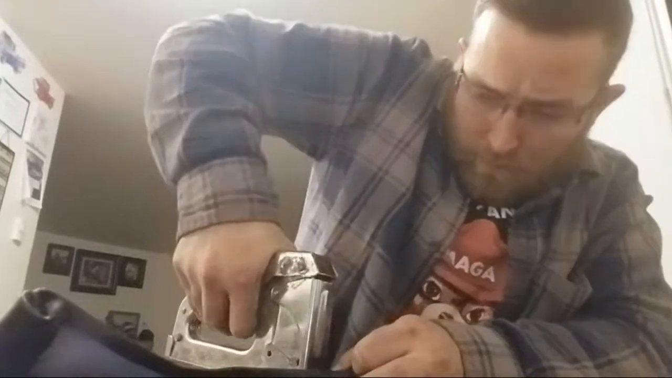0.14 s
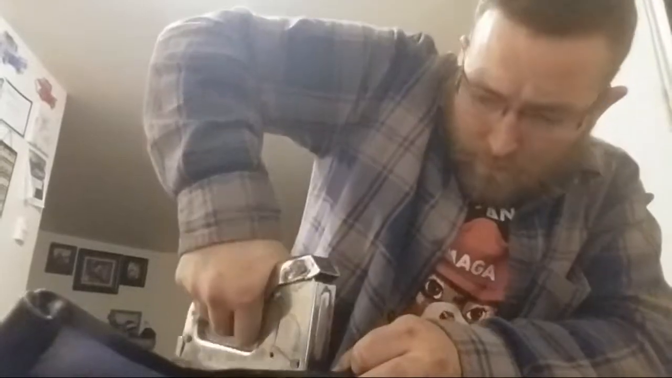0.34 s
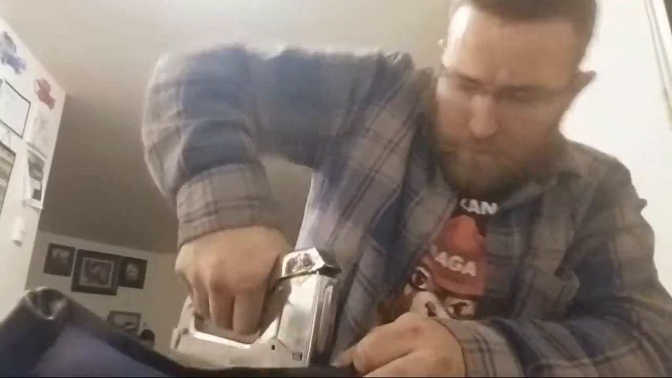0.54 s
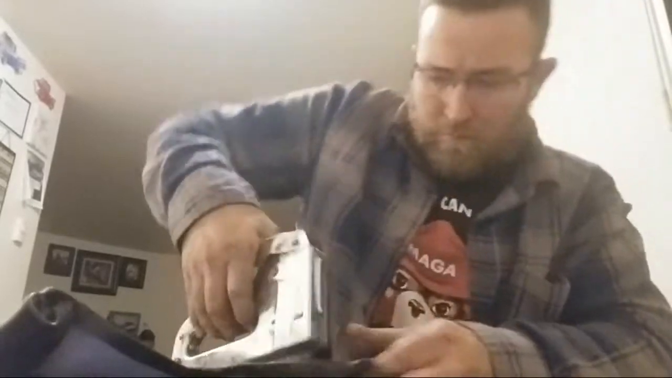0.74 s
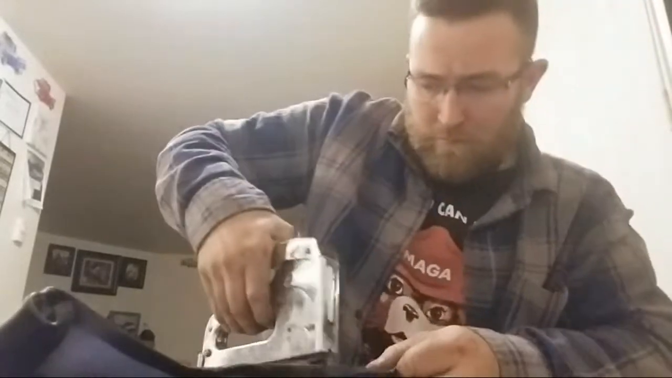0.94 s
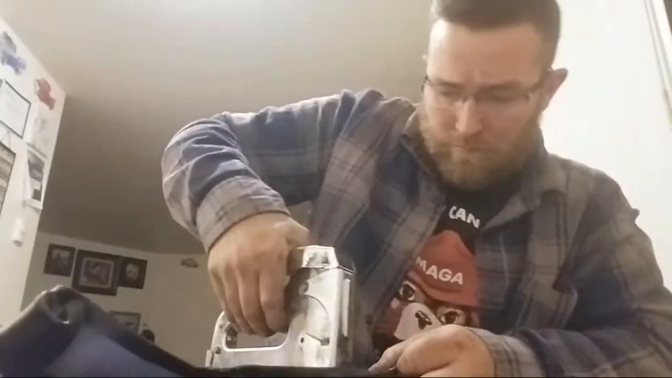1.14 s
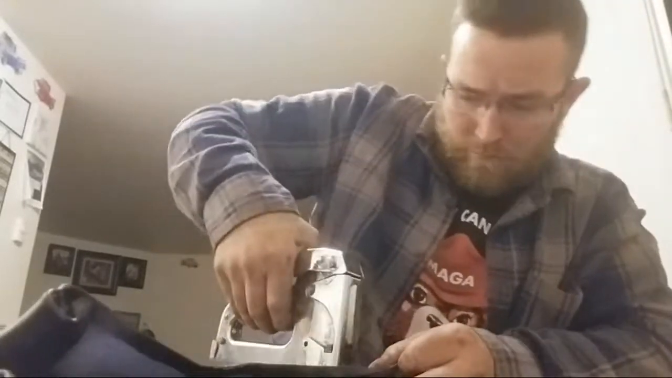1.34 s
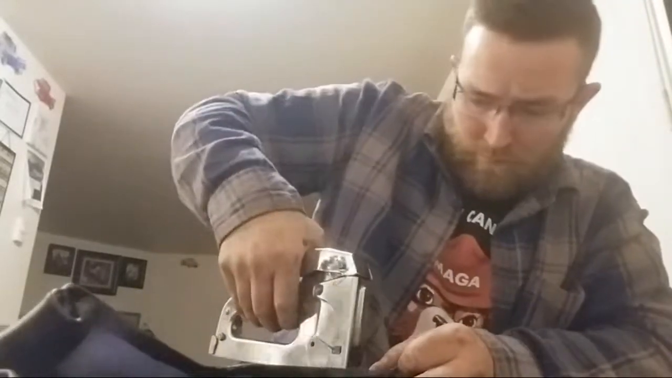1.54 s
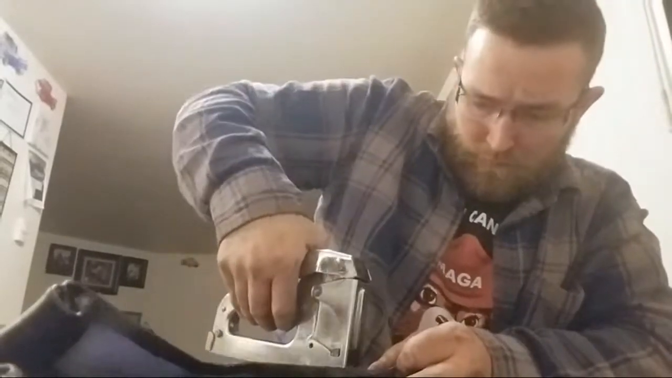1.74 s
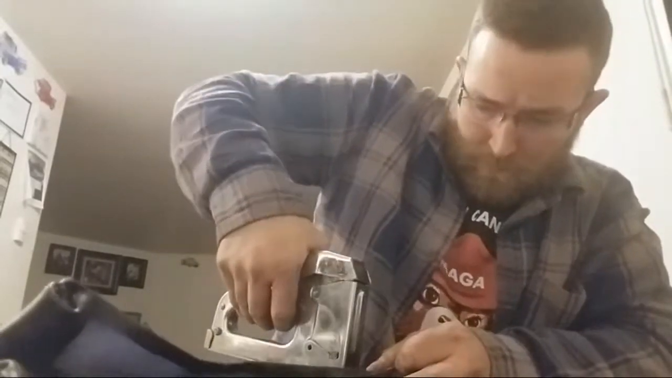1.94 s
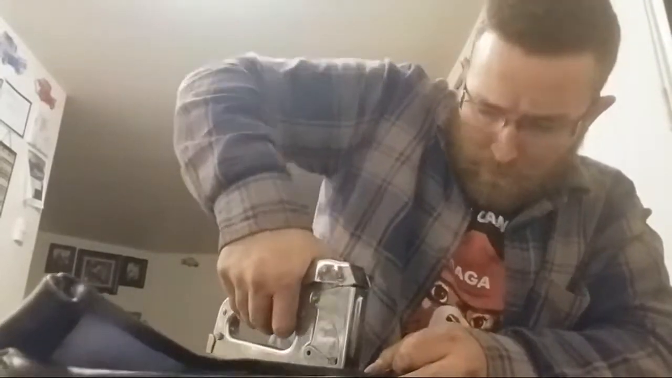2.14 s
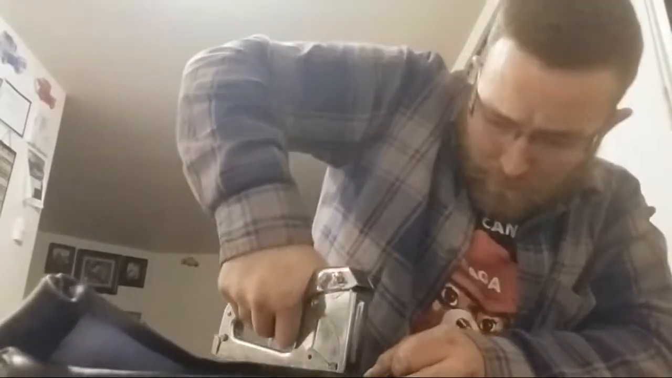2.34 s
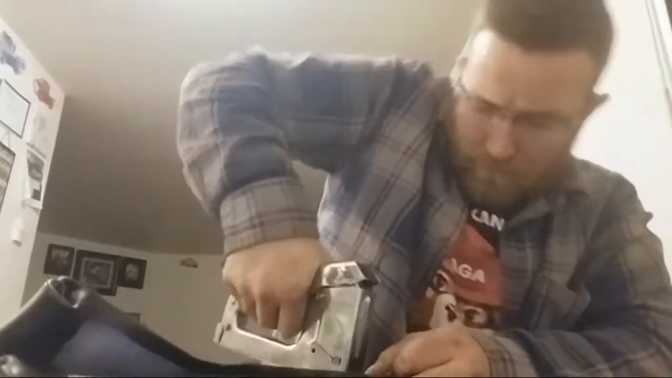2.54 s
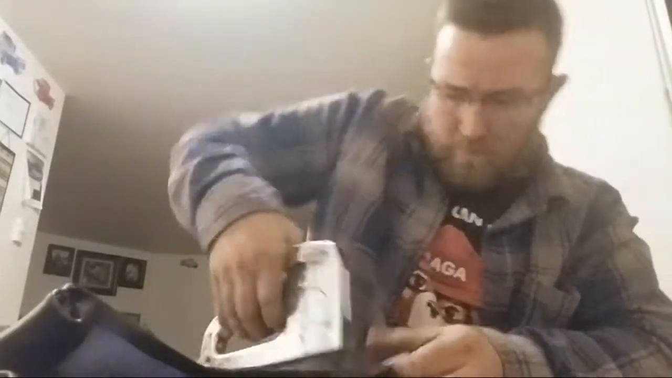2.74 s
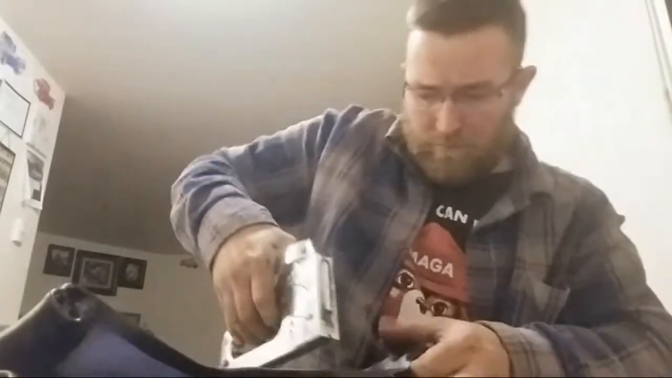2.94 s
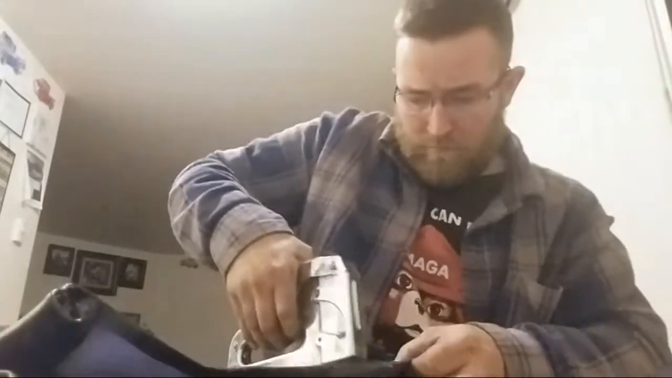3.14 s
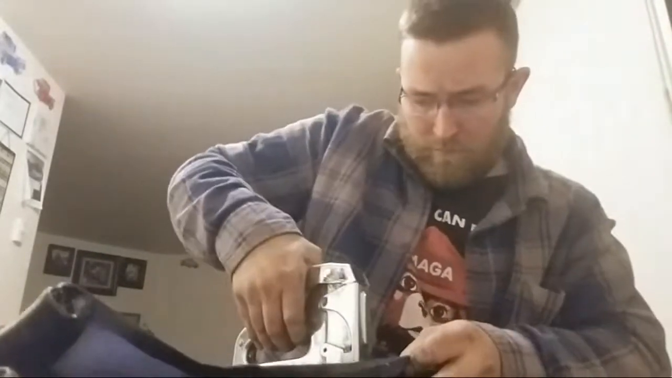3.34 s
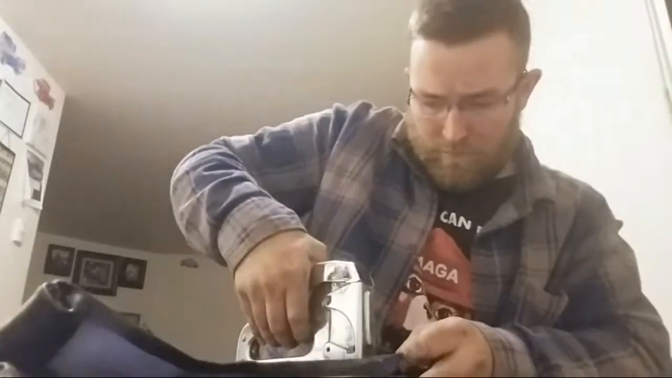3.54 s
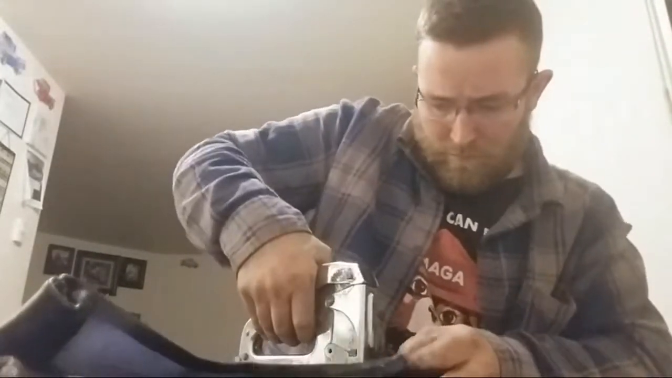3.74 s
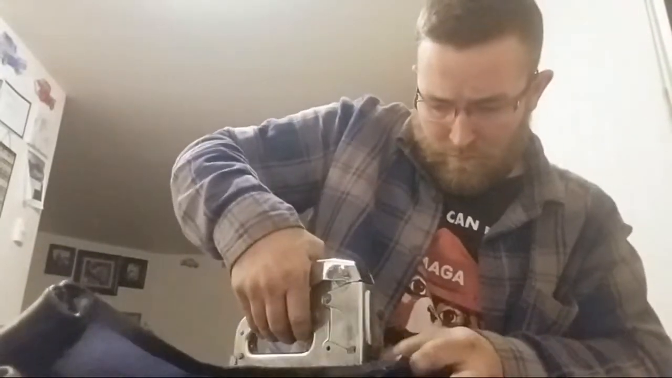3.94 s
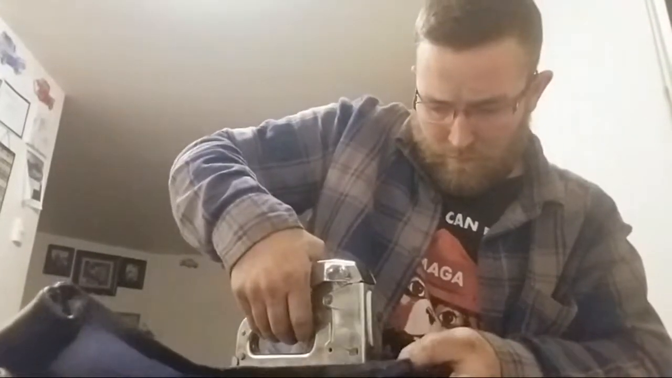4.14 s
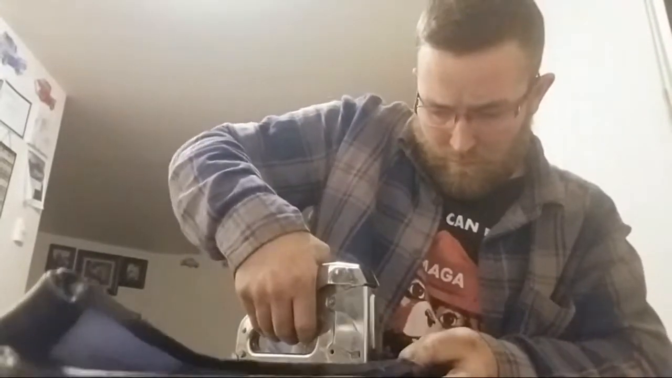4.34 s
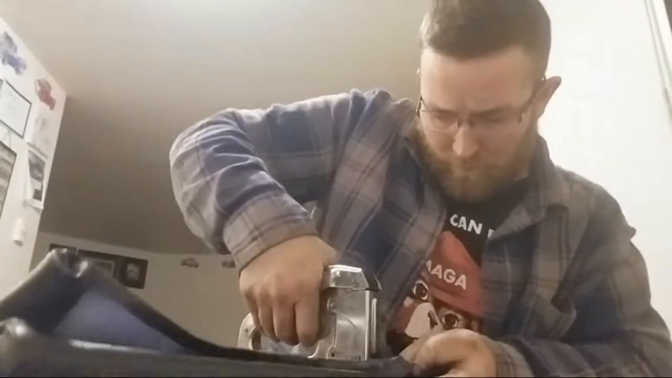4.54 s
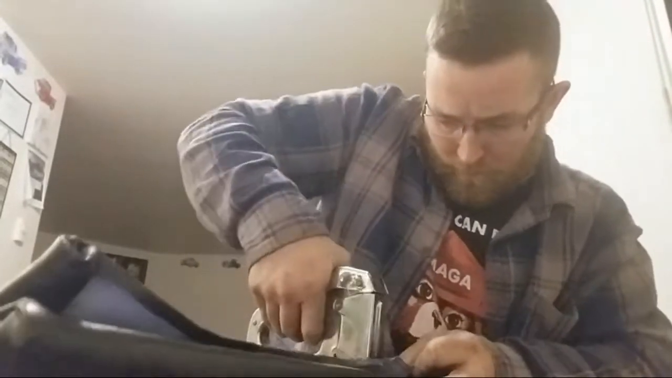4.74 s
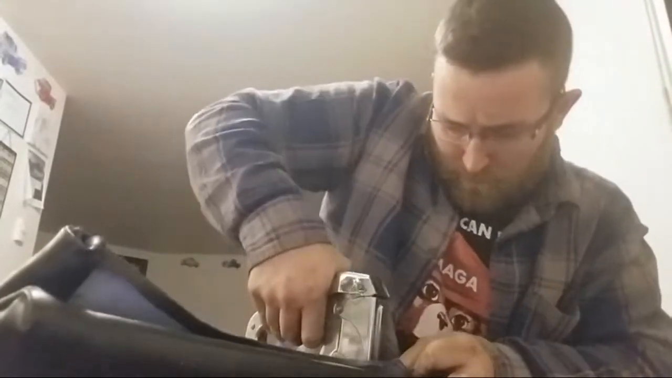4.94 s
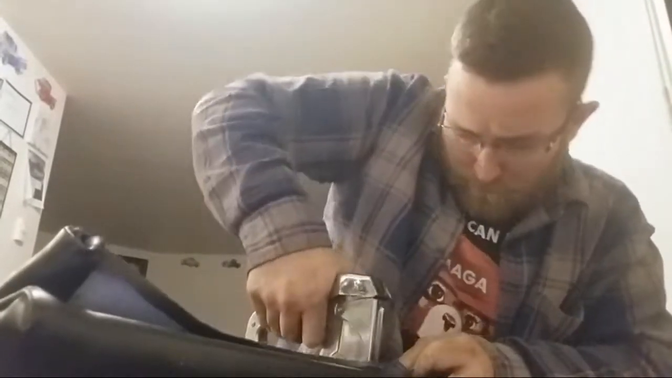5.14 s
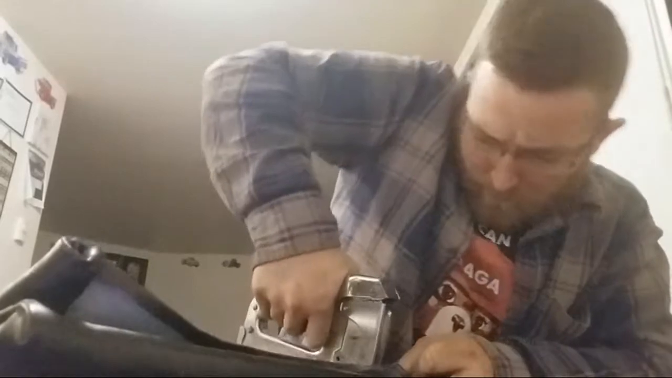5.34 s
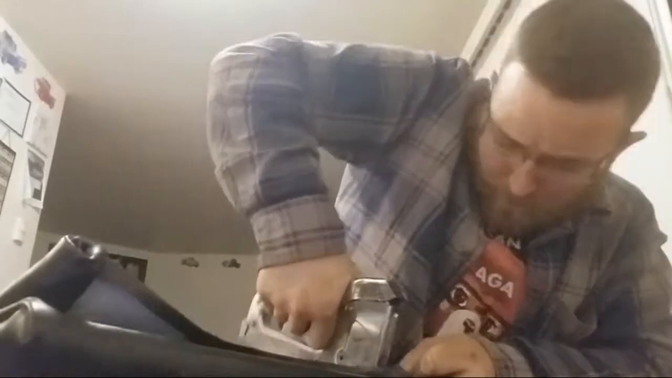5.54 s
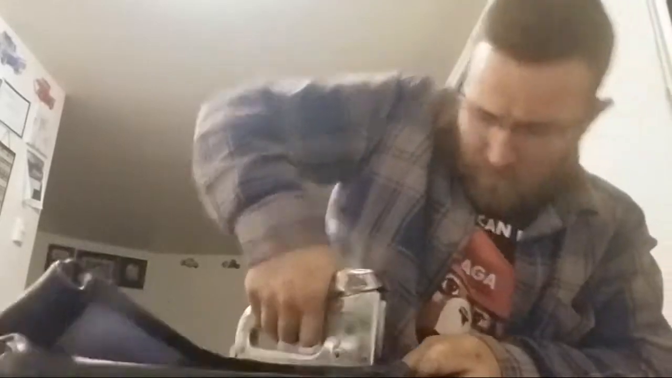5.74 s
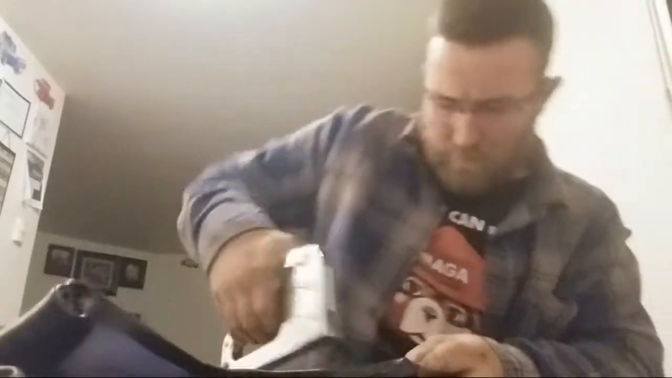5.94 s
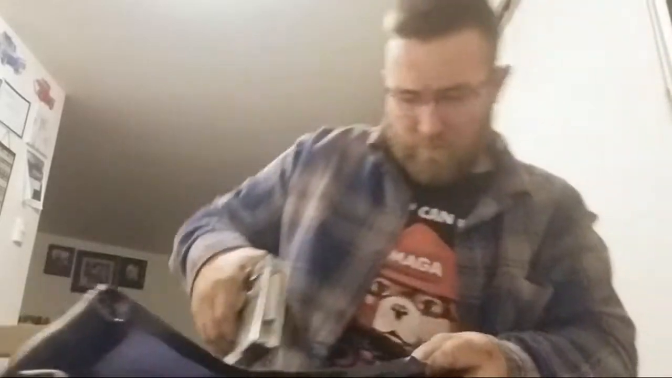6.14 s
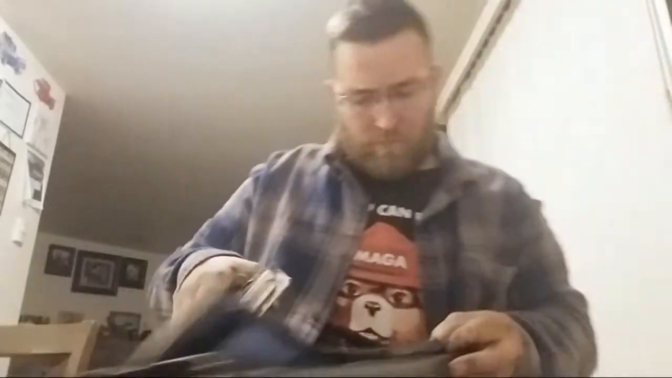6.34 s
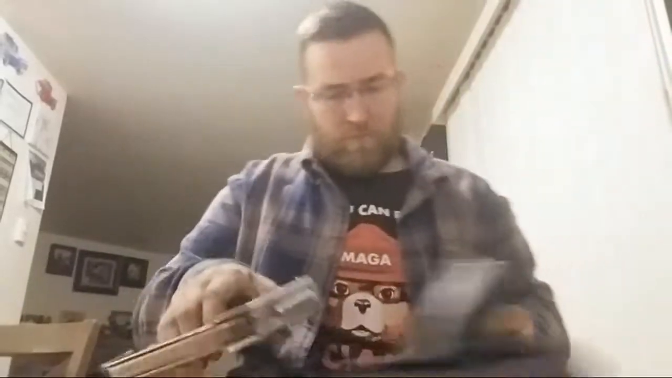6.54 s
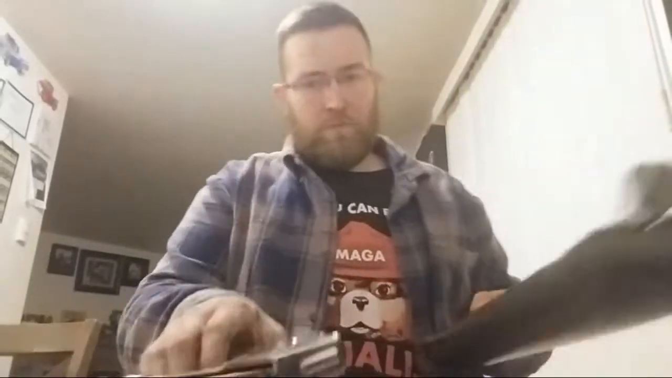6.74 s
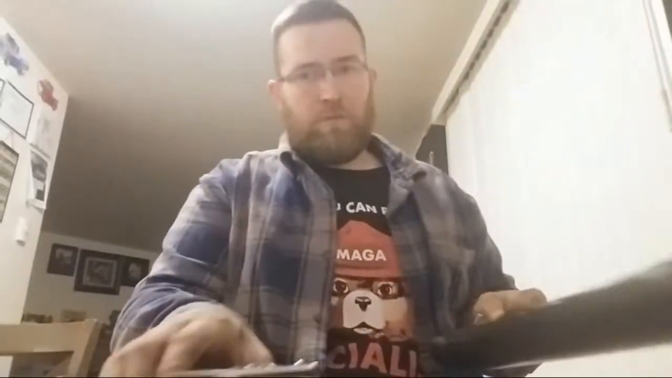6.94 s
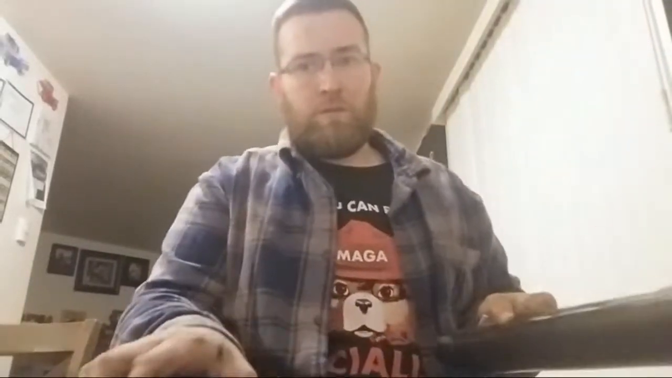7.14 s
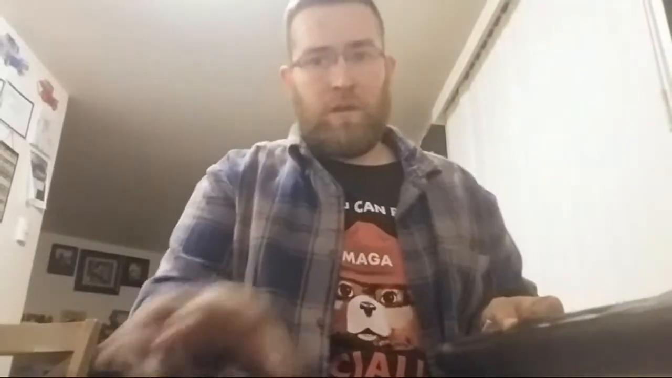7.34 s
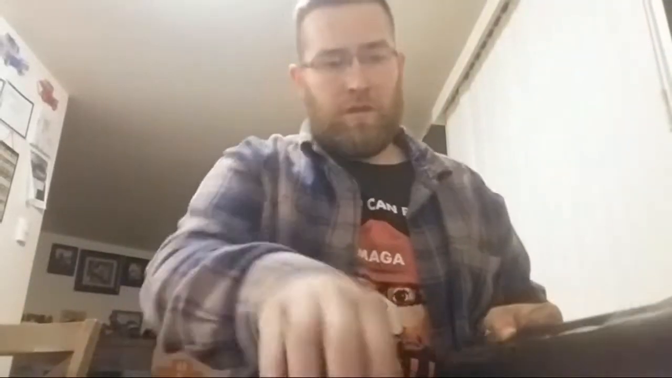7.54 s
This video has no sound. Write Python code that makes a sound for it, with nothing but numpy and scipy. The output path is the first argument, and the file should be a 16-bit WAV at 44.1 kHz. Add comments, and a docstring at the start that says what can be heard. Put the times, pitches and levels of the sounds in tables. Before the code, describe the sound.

In a small indoor room, close to the microphone, a sleeve rubs faintly, then a hand staple gun fires with a tiny latch snap and a hard woody slam. The handle clicks back, its spring singing thinly. Two more shots follow after pauses of cloth rustle and faint ticks. Finally the gun rattles down on a table and a vinyl seat is shoved. Each shot is flattened and the room briefly ducks.

```python
"""First a sleeve rubs faintly over the air of a small room; then a hand staple gun fires, three times in all.
Each time the latch slips, the driver slams a staple through upholstery into a seat board, the handle
clicks back and its spring sings. The gun is then laid on the table and the vinyl seat is shifted.
Blows are shaped noise and ringing modes, rubbing is grains of filtered noise, and echoes are fading noise.
At the microphone, the recorder's gain control flattens each shot and ducks the room for a second after it."""
import sys
import numpy as np
from scipy import signal
from scipy.fft import rfft, irfft
from scipy.io import wavfile
from scipy.ndimage import uniform_filter1d, minimum_filter1d

SR = 44100
rng = np.random.default_rng(int(sys.argv[2]) if len(sys.argv) > 2 else 0)


def transcribe(signal):
    """Save signal, clipped to [-1, 1], as a 16-bit WAV file at the path in sys.argv[1]."""
    frames = np.atleast_2d(signal).T
    limited = np.clip(frames, -1, 1)
    pcm = np.round(limited * 32767).astype(np.int16)
    wavfile.write(sys.argv[1], SR, pcm)


N = 338850
TIME = np.arange(N) / SR
RING = TIME[:int(.8 * SR)]  # every struck sound and echo tail stops after 0.8 s

# The three shots: (time [s], level [dB], ring of the board [dB], treble tilt [dB per octave], room [dB],
# pitch that this spot of the board favours [Hz], its lift [dB], bass of the room [dB])
STAPLE_SHOTS = [(.3400, 16.3, -9, 0.34, 1, 138, 9, -2), (2.3717, 16, -1.5, 0.1, 0.7, 820, 5, 4.5),
                (5.46, 15.5, 0, 0.8, 1.1, 620, 7, 7)]
# Modes of the seat board: (frequency [Hz], level [dB], t60 [s])
BOARD_MODES = [(71.5, -16.5, 0.26), (117, -7.5, 0.3), (148.2, -8, 0.38), (222, -8, 0.54), (321, 1, 0.41),
               (355.5, -5, .33), (376.3, 1, 0.46), (459, -8, 0.25), (485, -7, 0.47), (557.7, -4, 0.42),
               (604, -7, 0.27), (781, -3.5, 0.35), (852, -3.5, 0.23), (1920, -14.5, 0.25)]
# Colour of the driver's crack: (frequency [Hz], relative level [dB])
CRACK_COLOUR = [(30, -39), (60, -14.5), (100, -11.5), (200, -9), (350, -2.5), (550, -4), (800, 2.5),
                (1200, -7), (2500, -7.5), (4000, -14), (6500, -19.5), (9000, -18.5), (15500, -15.5)]
# Colour of the room's answer to a shot: (frequency [Hz], relative level [dB])
BOOM_COLOUR = [(30, -46), (48, -26), (70, -6), (140, -10.5), (250, -10.5), (350, -1), (620, -5), (900, -6),
               (1300, -9.5), (3000, -14.5), (5000, -15.5), (9000, -15.5), (15500, -18.5)]


def shots(crack_decay=0.0034, crack_rise=0.0022, crack_thin_db=-9, board_db=-17,
          spot_octaves=0.29, clump_db=1.0):
    """The driver cracks on the staple; the board rings and fills the room, bringing the bass a moment later."""
    out = np.zeros(N)
    for s, db, ring_db, tilt_db, room_db, spot_hz, spot_db, bass_db in STAPLE_SHOTS:
        shade_db = tilt(tilt_db) + spot_db * hill(bins(), spot_hz, spot_octaves)
        crack_colour_db = read(CRACK_COLOUR, bins()) + shade_db + crack_thin_db * hill(bins(), 110, 1.4)
        crack = blow(crack_decay, crack_colour_db, rise=crack_rise)

        boom_colour_db = read(BOOM_COLOUR, bins()) + shade_db + bass_db * hill(bins(), 170, 1.3)
        boom = colour(reflections(onset=0.0096), boom_colour_db)
        boom *= np.linalg.norm(crack) / np.linalg.norm(boom)
        boom *= amp(clump_db * drift(160)[:len(boom)])  # echoes arrive in clumps

        board = np.zeros(len(RING))
        for hz, mode_db, t60 in BOARD_MODES:
            favour_db = spot_db * hill(hz, spot_hz, spot_octaves)
            board += amp(mode_db + favour_db) * mode(hz, t60, rise=0.007)
        add(out, s, amp(db) * (crack + amp(room_db) * boom + amp(board_db + ring_db) * board))
    return out


# The latch slips just before each shot: (time [s], level [dB], level of its creep [dB],
# level of its bounce [dB], favoured ring [Hz], lift of that ring [dB])
LATCH_SLIPS = [(0.306, -15.5, -25.5, -32, 2160, 4), (2.342, -15, -36, -32, 940, 3.5),
               (5.4144, -15, -36, -21, 2580, 11.5)]
CREEP_S, BOUNCE_S, LATCH_DECAY_S = .0052, .0085, .003  # creep before the slip, bounce after it
LATCH_TILT, CREEP_TILT = -0.94, -4.5  # dB per octave
# The handle springs back after each shot: (time [s], level added to every step [dB],
# treble tilt [dB per octave], level of the singing spring [dB])
HANDLE_RETURNS = [(.6495, 0, -0.4, -57), (2.6760, -0.5, 0.4, -40.5), (5.8295, 0.5, -1, -46)]
# Each return unhooks, scrapes, slaps the stop and rebounds: (time from the slap [s], level [dB],
# decay [s], treble tilt [dB per octave], favoured ring [Hz], lift of that ring [dB])
HANDLE_STEPS = [(-.0218, -20.5, 0.0052, 2, 3200, 10), (-.006, -23.5, .004, -2, 3138, 7),
                (0, -10.5, 0.004, 2.5, 3130, 7), (.0098, -18, 0.0024, 2, 1330, 3.5)]
# The gun ticks as it is placed and gripped: (time [s], level [dB])
GRIP_TICKS = [(3.6852, -39.5), (4.251, -44.5)]
TICK_DECAY_S, TICK_TILT, TICK_RING_HZ, TICK_LIFT_DB = .003, 0, 3020, 8  # tilt in dB per octave
# Loose parts jangle just after each contact of the laid gun, losing less each time than the wood does
JANGLE_AFTER_S, JANGLE_DB, JANGLE_LOSS_SHARE, JANGLE_DECAY_S = .004, -22, .4, .0045
JANGLE_TILT, JANGLE_RING_HZ, JANGLE_LIFT_DB = -.5, 3400, 5  # tilt in dB per octave


def steel_contacts():
    """Every snap of steel: (time [s], level [dB], decay [s], tilt [dB per octave], ring [Hz], lift [dB])."""
    for s, db, creep_db, bounce_db, *ring in LATCH_SLIPS:
        yield s - CREEP_S, creep_db, LATCH_DECAY_S, CREEP_TILT, *ring
        yield s, db, LATCH_DECAY_S, LATCH_TILT, *ring
        yield s + BOUNCE_S, bounce_db, LATCH_DECAY_S, LATCH_TILT, *ring
    for s, db, tilt_db, _ in HANDLE_RETURNS:
        for delay, step_db, decay, step_tilt_db, *ring in HANDLE_STEPS:
            yield s + delay, db + step_db, decay, tilt_db + step_tilt_db, *ring
    for s, db in GRIP_TICKS:
        yield s, db, TICK_DECAY_S, TICK_TILT, TICK_RING_HZ, TICK_LIFT_DB
    for s, loss_db in rattle():
        jangle_db = JANGLE_DB - JANGLE_LOSS_SHARE * loss_db
        yield s + JANGLE_AFTER_S, jangle_db, JANGLE_DECAY_S, JANGLE_TILT, JANGLE_RING_HZ, JANGLE_LIFT_DB


# Resonances of the gun's steel body: (frequency [Hz], width [Hz], relative level [dB])
STEEL_BODY = [(957, 200, -1), (1223, 180, 2.5), (1820, 400, -1), (2430, 180, -3), (2990, 380, -3),
              (3720, 250, -8), (4250, 780, -10.5), (6500, 4700, -9), (9000, 450, -7.5), (10000, 910, -11.5),
              (11480, 980, -7), (12700, 2200, -12), (15000, 2400, -10)]


def clicks(room_db=-9, send_db=-0.5, dip_hz=3100, dip_db=-8, between_db=-21, ring_octaves=0.2):
    """Small steel parts snap against the gun's body, which colours each short burst of contact noise."""
    steel_db = body(STEEL_BODY, between_db - 10 * np.log10(1 + (bins() / 6000) ** 2))
    out = np.zeros(N)
    for s, db, decay, tilt_db, ring_hz, ring_db in steel_contacts():
        shade_db = tilt(tilt_db) + ring_db * hill(bins(), ring_hz, ring_octaves)
        add(out, s, amp(db) * blow(decay, steel_db + shade_db, rise=0.0009))
    # the room returns less of the steel's 3 kHz ring
    to_room = colour(out, tilt(send_db) + dip_db * hill(bins(), dip_hz, 0.25))
    return out + amp(room_db) * room(to_room)


SPRING_HZ, SPRING_T60, SPRING_AFTER_S = 4350, 0.52, .1  # the spring sings a moment after each return
SPRING_TAIL_DB, SPRING_TAIL_T60 = -14, 2.2  # the coil's second way of swinging dies more slowly
CHIME_HZ, CHIME_DB, CHIME_T60 = 8800, -37, .25  # the slap leaves a thin ring in the steel


def springs(beat_hz=7):
    """Two close modes of the coil beat slowly after each return, and the slapped steel chimes."""
    out = np.zeros(N)
    for s, *_, spring_db in HANDLE_RETURNS:
        spring = mode(SPRING_HZ, SPRING_T60, rise=0.016)
        spring += amp(SPRING_TAIL_DB) * mode(SPRING_HZ + beat_hz, SPRING_TAIL_T60, rise=0.026)
        add(out, s + SPRING_AFTER_S, amp(spring_db + 1.5 * drift(18)[:len(spring)]) * spring)
        add(out, s, amp(CHIME_DB) * mode(CHIME_HZ, CHIME_T60, rise=.002))
    return out


# The gun is laid down and rattles to rest, while more of its weight comes onto the table
LAY_S, RATTLE_GAP_S, RATTLE_SHRINK, RATTLE_LOSS_DB = 7.0706, .0066, .88, 5
LAY_WOOD_DB, LAY_BRIGHT_HZ, LAY_DECAY_S = -11.5, 2260, 0.0048
LAY_THUD_DB, LAY_THUD_HZ = -35.5, 150  # the thud of the first contact


def rattle(count=4):
    """Contacts of the gun as it settles, each sooner and weaker: (time [s], loss below the first [dB])."""
    for k in range(count):
        wait = RATTLE_GAP_S * sum(RATTLE_SHRINK ** j for j in range(k))
        yield LAY_S + wait, RATTLE_LOSS_DB * k


# Hard knocks on seat board and table: (time [s], level [dB], brightness [Hz], thud [dB], thud pitch [Hz])
HARD_KNOCKS = [(1.1019, -39, 3030, -47, 230), (1.477, -52, 2500, -63, 200), (3.761, -41.5, 1680, -59, 150),
               (5.3245, -31.5, 1950, -39, 122), (5.632, -16, 700, -42, 126), (7.1488, -22, 1940, -30, 193),
               (7.2680, -18.5, 2200, -27.5, 122), (7.2690, -12.5, 720, -21.5, 305)]
KNOCK_DECAY_S = .0035
# Soft bumps of the padded seat: (time [s], level [dB], thud [dB])
SEAT_BUMPS = [(.584, -23, -32), (.686, -25.5, -33), (.807, -25.5, -35), (.938, -38.5, -47),
              (5.328, -38, -45), (5.700, -12.5, -31), (7.560, -31, -46), (7.601, -46, -36)]
BUMP_BRIGHT_HZ, BUMP_DECAY_S, BUMP_THUD_HZ = 800, 0.024, 141


def wood_contacts():
    """Every blow on wood: (time [s], level [dB], brightness [Hz], decay [s], thud [dB], thud pitch [Hz])."""
    for s, db, bright_hz, thud_db, thud_hz in HARD_KNOCKS:
        yield s, db, bright_hz, KNOCK_DECAY_S, thud_db, thud_hz
    for s, db, thud_db in SEAT_BUMPS:
        yield s, db, BUMP_BRIGHT_HZ, BUMP_DECAY_S, thud_db, BUMP_THUD_HZ
    for s, loss_db in rattle():  # added weight strengthens the thud
        yield s, LAY_WOOD_DB - loss_db, LAY_BRIGHT_HZ, LAY_DECAY_S, LAY_THUD_DB + loss_db, LAY_THUD_HZ


# Resonances of the table top: (frequency [Hz], width [Hz], relative level [dB])
TABLE_TOP = [(390, 450, 1), (930, 240, 1), (1304, 150, 0), (1876, 410, -2), (2330, 250, -5), (3470, 950, 4)]
# Low modes of the table under the seat: (frequency [Hz], level [dB], t60 [s])
TABLE_MODES = [(92, -3, .18), (118, -.5, .22), (145.4, -1, .22), (178, -1, .16), (217, 1, .17),
               (253, 0.5, 0.21), (319.5, 2, .22), (383, -4.5, .17), (490, -1, 0.13)]


def knocks(room_db=-11, low_edge=0.24, steepness=11, between_db=-6, hard_s=0.0023,
           spot_db=12, spot_octaves=0.41):
    """Hard contacts knock more suddenly, some bright and some dull; wood thuds with modes the spot favours."""
    out = np.zeros(N)
    wood_db = body(TABLE_TOP, between_db)
    for s, db, bright_hz, decay, thud_db, thud_hz in wood_contacts():
        ratio = bins() / bright_hz
        contact_db = -10 * np.log10((1 + ratio ** steepness) * (1 + (low_edge / ratio) ** 5.3))
        knock = blow(decay, wood_db + contact_db, rise=0.21 * decay, strike=hard_s / decay)
        thud = np.zeros(len(RING))
        for hz, mode_db, t60 in TABLE_MODES:
            favour_db = spot_db * (hill(hz, thud_hz, spot_octaves) - 1)
            thud += amp(mode_db + favour_db) * mode(hz, t60, rise=0.0033)
        add(out, s, amp(db) * knock + amp(thud_db) * thud)
    return out + amp(room_db) * room(out)


# Slides in which the vinyl squeaks: (start [s], length [s], level [dB], centre [Hz], width [Hz])
VINYL_SQUEAKS = [(0.074, 0.11, -52, 1020, 200), (1.18, 0.17, -58, 1710, 120),
                 (4.36, 0.12, -50.5, 1110, 200), (4.672, .17, -50, 1135, 160),
                 (5.697, 0.013, -20, 1800, 503), (7.355, 0.029, -50.5, 4850, 254),
                 (7.455, .17, -48.5, 2680, 450), (7.62, 0.1, -52, 1450, 300)]


def squeaks():
    """Short slides of vinyl, each a narrow band of uneven friction."""
    out = np.zeros(N)
    for s, length, db, hz, width in VINYL_SQUEAKS:
        band_db = -20 * np.log10(1 + (2 * (bins() - hz) / width) ** 2)
        slide = evened(colour(rng.standard_normal(int(length * SR)), band_db))
        add(out, s, amp(db) * slide * signal.windows.tukey(len(slide), .7))
    return out


# Shoves of the vinyl seat as it is lifted: (middle [s], length [s], level [dB])
SEAT_SHOVES = [(6.95, 0.61, -54.5), (7.33, .4, -46), (7.6, 0.35, -41.5)]
# Colour of rubbed vinyl: (frequency [Hz], relative level [dB])
VINYL_COLOUR = [(60, -7.5), (140, 10.5), (220, -3.5), (600, 4.5), (1000, -8), (1400, -12), (2300, -8.5),
                (2750, -8), (3400, -22), (5000, -19), (9000, -27)]


def seat_rub():
    """The vinyl seat rubs as it is shoved, in grains of filtered noise."""
    return rubbing(swells(SEAT_SHOVES), VINYL_COLOUR, grain_db=2.5, room_db=-5.5)


# Other sweeps of the arm: (middle [s], length [s], level [dB])
ARM_SWEEPS = [(.1, 0.13, -54.5), (.88, 0.83, -52), (1.5, 0.59, -58.5), (3.2, 2.9, -58.5), (4.05, 0.62, -56),
              (4.43, 0.48, -52.5), (4.73, 0.34, -52.5), (5.0, 0.37, -54.5), (6.2, 0.5, -50.5),
              (6.44, 0.14, -49), (7.29, 0.13, -42.5)]
# Colour of rubbed cloth: (frequency [Hz], relative level [dB])
CLOTH_COLOUR = [(60, -12), (300, 0.5), (1100, 6), (1600, -1), (4000, -6.5), (7000, -8), (10000, -15.5),
                (15500, -14.5)]
SLEEVE_DB, PRESS_DB, PRESS_S = -65.5, -51.5, 0.55  # constant rub; extra press at each shot and its length


def sleeve_rub():
    """The sleeve rubs all the time, and harder as the arm sweeps or bears down for each shot."""
    presses = [(s, PRESS_S, PRESS_DB) for s, *_ in STAPLE_SHOTS]
    arm = amp(SLEEVE_DB) + swells(ARM_SWEEPS) + swells(presses)
    return rubbing(arm, CLOTH_COLOUR, grain_db=3, room_db=-5.0)


def rubbing(gain, spectrum, grain_db, room_db):
    """Tiny slips of uneven size, as dense as hiss, that swell with the movement."""
    slipping = rng.random(N) < 5000 / SR  # about 5000 slips per second
    slip_size = amp(grain_db * np.minimum(rng.exponential(1, N), 5))
    slips = rng.standard_normal(N) * slipping * slip_size
    sound = evened(patchy(colour(slips, read(spectrum, bins())), patchy_db=4.0))
    sound *= gain * amp(2 * drift(30))
    return sound + amp(room_db) * room(sound)


def swells(moves):
    """Each movement gathers speed and slows again: its gain over time."""
    gain = np.zeros(N)
    for s, length, db in moves:
        gain += amp(db) * np.cos(np.pi * np.clip((TIME - s) / length, -.5, .5)) ** 2
    return gain


# Colour of the room's air: (frequency [Hz], relative level [dB])
AIR_COLOUR = [(30, -28.5), (60, -5.5), (140, -1), (280, -3), (335, 1), (450, 0.5), (800, -4), (1050, -1),
              (1400, -10), (2500, -14), (4300, -13.5), (6500, -18.5), (9000, -24), (15500, -26)]
# Faint hum in the room: (frequency [Hz], level [dB])
ROOM_HUM = [(320, -57.5), (338, -63), (378, -65), (1040, -71)]
AIR_DB = -51.5


def room_tone():
    """Air noise with a slight drift in level, and hum tones that waver in level and phase."""
    air = evened(patchy(colour(rng.standard_normal(N), read(AIR_COLOUR, bins())), patchy_db=2.0))
    air *= amp(AIR_DB + 0.82 * drift(2.4))
    hum = np.zeros(N)
    for hz, db in ROOM_HUM:
        hum += amp(db + 3.2 * drift(4.9)) * np.sin(2 * np.pi * hz * TIME + 0.74 * drift(19))
    return air + hum


# Decay of the small room: (frequency [Hz], t60 [s])
ROOM_DECAY = [(80, 0.4), (300, .39), (1000, 0.45), (3000, 0.45), (6000, .4), (10000, 0.33), (15000, 0.33)]


def reflections(onset=0.0017):
    """Dense echoes of the room, each band dying at its own speed; unit energy."""
    hz, t, z = signal.stft(rng.standard_normal(len(RING)), SR, nperseg=256)
    fade = 1000 ** (-t / read(ROOM_DECAY, hz)[:, None])
    tail = signal.istft(z * fade, SR, nperseg=256)[1][:len(RING)]
    tail *= 1 - np.exp(-(RING / onset) ** 2)
    return tail / np.linalg.norm(tail)


def room(x):
    """What the room gives back: the sound spread over its reflections."""
    return signal.fftconvolve(x, reflections())[:len(x)]


def blow(decay, db, rise=.0007, strike=0):
    """A first strike and the contact chatter after it, through a colour; the energy equals 5 ms at full level."""
    chatter = rng.standard_normal(len(RING))
    envelope = np.exp(-RING / max(2 * decay, 1e-4)) * (1 - np.exp(-RING / rise))
    for _ in range(3):  # a hard contact drives all frequencies evenly
        spectrum = rfft(chatter * envelope)
        chatter = irfft(spectrum / (abs(spectrum) + 1e-12), len(RING))
    force = chatter * np.sqrt(envelope)
    force[0] += strike * np.linalg.norm(force)
    sound = colour(force, db)
    return sound * np.sqrt(.005 * SR / np.sum(sound ** 2))


def mode(hz, t60, rise):
    """One swelling and dying resonance."""
    swing = np.sqrt(2) * np.sin(2 * np.pi * (hz * RING + rng.random()))
    return swing * 1000 ** (-RING / t60) * (1 - np.exp(-RING / rise))


def body(resonances, between_db):
    """Gain in dB of a body with these resonances and a level between them."""
    power = amp(between_db) ** 2
    for hz, width, db in resonances:
        power = power + amp(db) ** 2 / (1 + (2 * (bins() - hz) / width) ** 2) ** 2
    return 10 * np.log10(power)


def patchy(x, patchy_db):
    """Lets patches of the spectrum swell and fade, as the contact of a rub wanders."""
    z = signal.stft(x, SR, nperseg=1024)[2]
    field = rng.standard_normal(z.shape)
    for _ in range(2):  # smooth over frequency, then time
        field = uniform_filter1d(uniform_filter1d(field, size=9, axis=0), size=9, axis=1)
    return signal.istft(z * amp(patchy_db * evened(field)), SR, nperseg=1024)[1][:N]


def colour(x, db):
    """Causal minimum-phase filter with the gain db on bins(), at most 100 dB below its peak."""
    log_gain = np.log(amp(np.maximum(db, db.max() - 100)))
    circle = np.concatenate([log_gain, log_gain[-2:0:-1]])
    taps = np.fft.ifft(np.exp(np.conj(signal.hilbert(circle)))).real
    return signal.fftconvolve(x, taps)[:len(x)]


def tilt(db_per_octave):
    """Gain in dB that brightens or dulls about 2 kHz, level below 500 Hz."""
    return db_per_octave * np.log2(np.maximum(bins(), 500) / 2000)


def hill(hz, centre_hz, octaves):
    """A hill of height 1 about centre_hz."""
    return np.exp(-(np.log2(hz / centre_hz) / octaves) ** 2)


def bins(size=4096):
    """Frequencies on which colours are given, shifted 1 Hz to avoid zero."""
    return np.fft.rfftfreq(size, 1 / SR) + 1


def drift(rate_hz):
    """Slow chance: straight lines between random knots of unit size."""
    knots = rng.standard_normal(1024)
    return np.interp(TIME * rate_hz, np.arange(len(knots)), knots)


def read(points, hz):
    """Joins (Hz, value) points on a log-frequency axis."""
    f, value = np.transpose(points)
    return np.interp(np.log(hz + 1), np.log(f + 1), value)


def amp(db):
    """Gain factor of a level in dB."""
    return 10 ** (np.asarray(db) / 20)


def evened(x):
    """Scales to unit RMS."""
    return x / np.sqrt(np.mean(x ** 2) + 1e-20)


def add(mix, s, sound):
    """Mixes a sound in at time s."""
    part = mix[round(s * SR):][:len(sound)]
    part += sound[:len(part)]


def scene():
    """Gun, handling and room together, as they reach the microphone."""
    gun = shots() + clicks() + springs()
    handling = knocks() + squeaks() + seat_rub() + sleeve_rub()
    return (gun + handling + room_tone())[None]


def released(db, db_per_s):
    """Follows db upward at once and falls back at a steady rate."""
    return np.maximum.accumulate(db + db_per_s * TIME) - db_per_s * TIME


# Colour of the microphone: (frequency [Hz], gain [dB])
MICROPHONE_COLOUR = [(5200, -1.5), (6200, -6.5), (7900, -7), (8400, 3.5), (9000, 4), (12000, 3.5),
                     (15500, 1.5)]
EDGE_HZ = 15900  # upper band limit


def record(dry, limit_db=-9.5, duck_db=18.0, hold=1.05):
    """Microphone colour, quick limiter, slow gain control that holds and recovers, clipping, and band limit."""
    x = colour(dry[0], read(MICROPHONE_COLOUR, bins()))
    power = abs(uniform_filter1d(x ** 2, size=176))  # over 4 ms
    over_db = np.maximum(10 * np.log10(power + 1e-12) - limit_db, 0)

    # the slow control keeps the largest excess of the last hold seconds
    size = int(hold * SR) // 2 * 2 + 1
    ducked_db = np.minimum(over_db, duck_db)
    held_db = -minimum_filter1d(-ducked_db, size, origin=size // 2, mode="constant")

    cut_db = np.maximum(released(over_db, 200), released(held_db, 44.4))
    x = x / amp(uniform_filter1d(cut_db, size=40))
    x = np.clip(x, -.92, .92)
    band_limit = signal.firwin(511, EDGE_HZ, window=("kaiser", 9), fs=SR)
    return signal.oaconvolve(x, band_limit, "same")[None]


dry = scene()
out = record(dry)
transcribe(out)
```